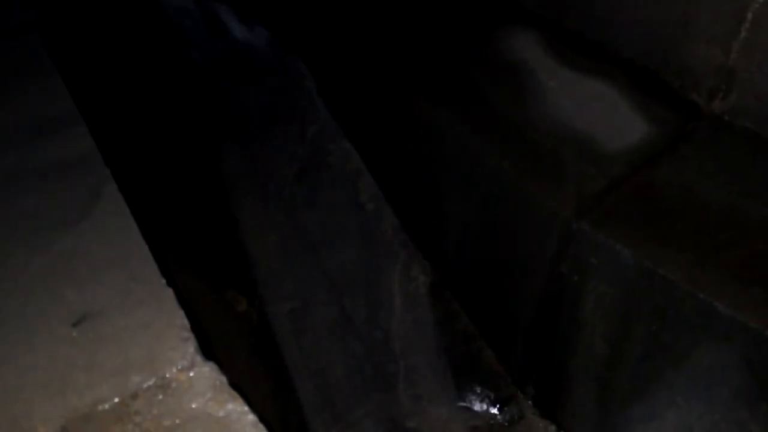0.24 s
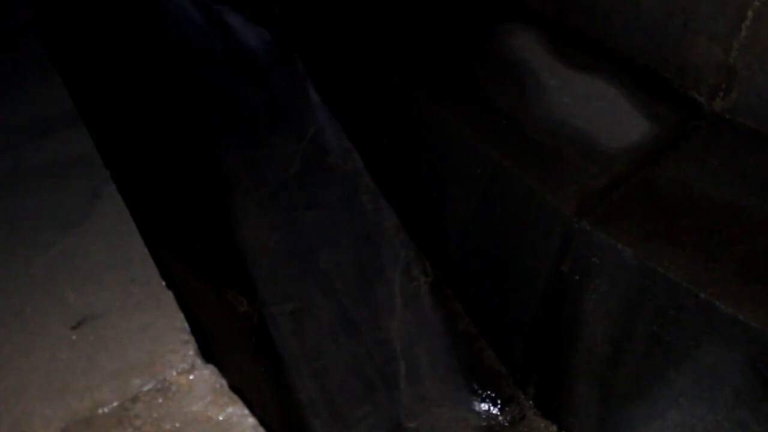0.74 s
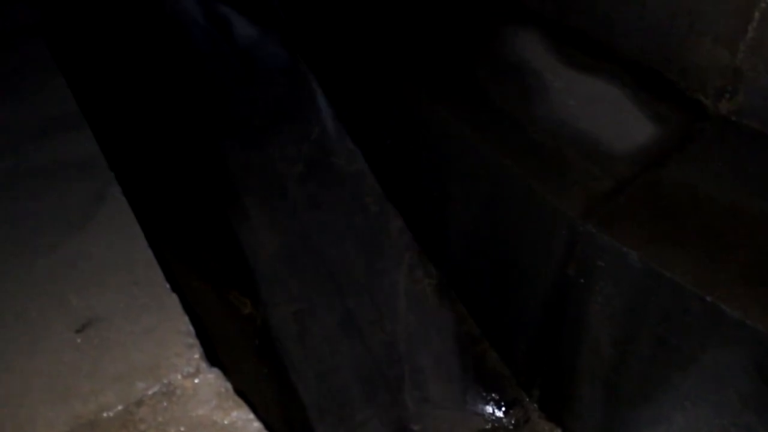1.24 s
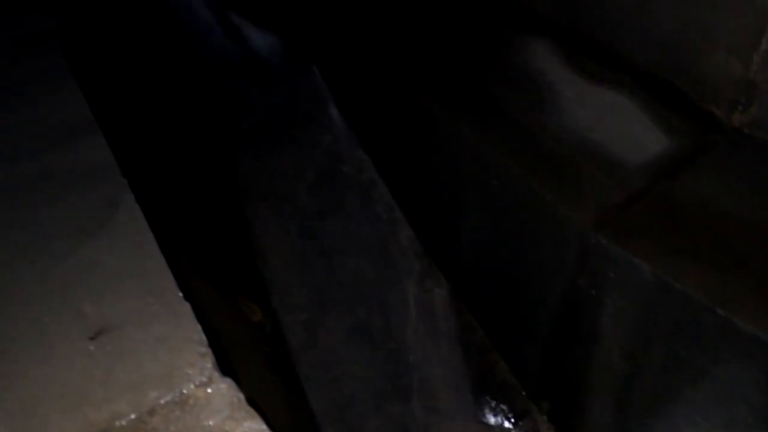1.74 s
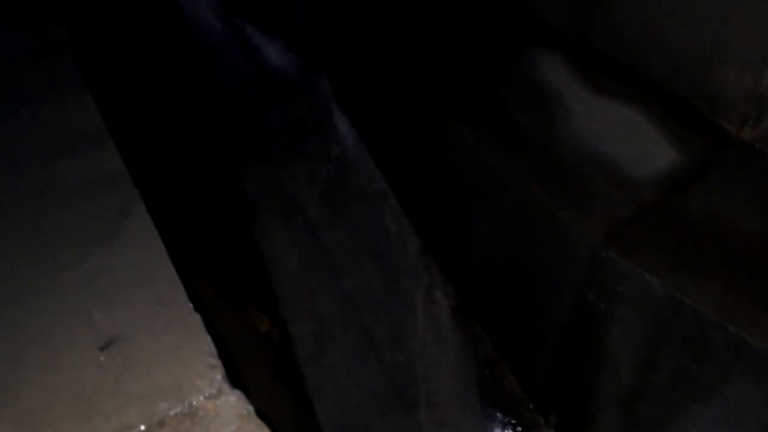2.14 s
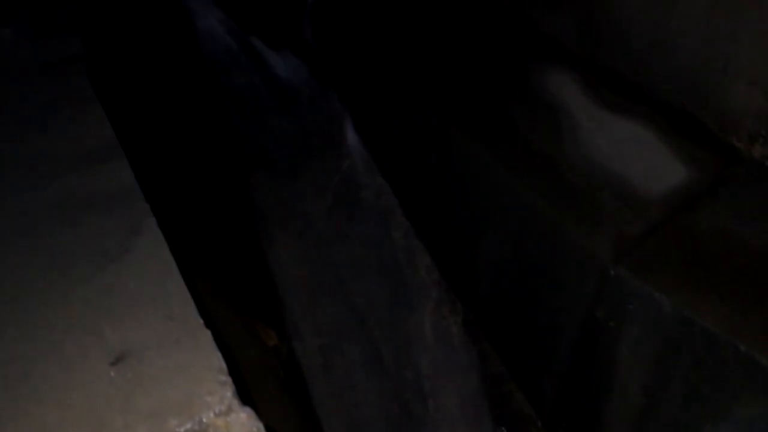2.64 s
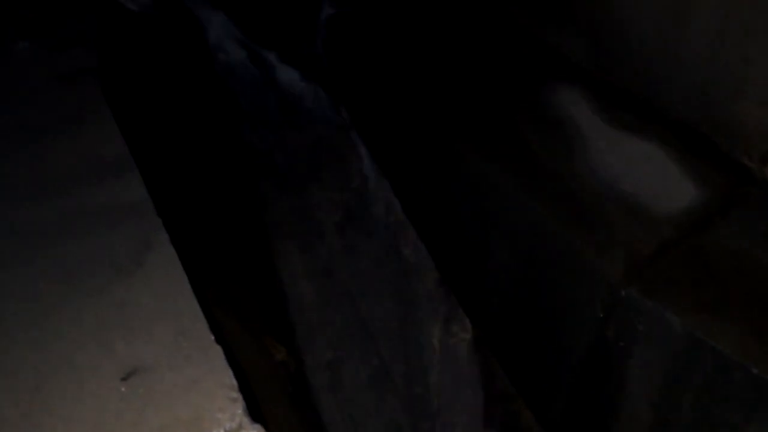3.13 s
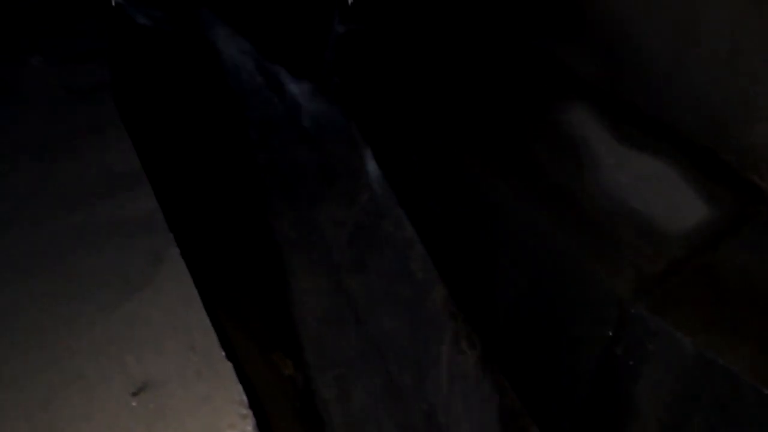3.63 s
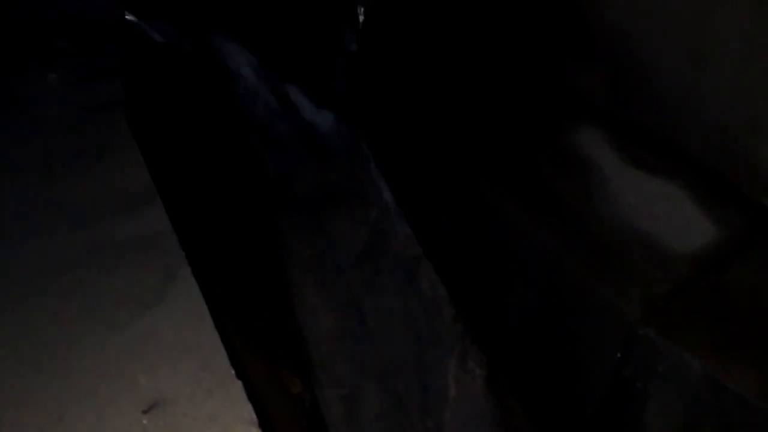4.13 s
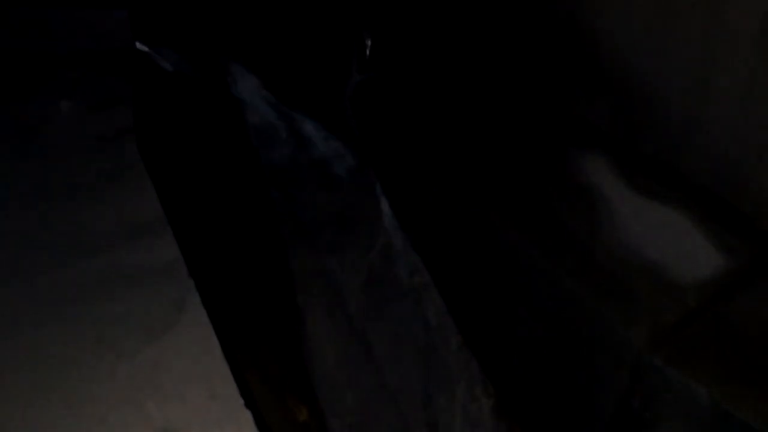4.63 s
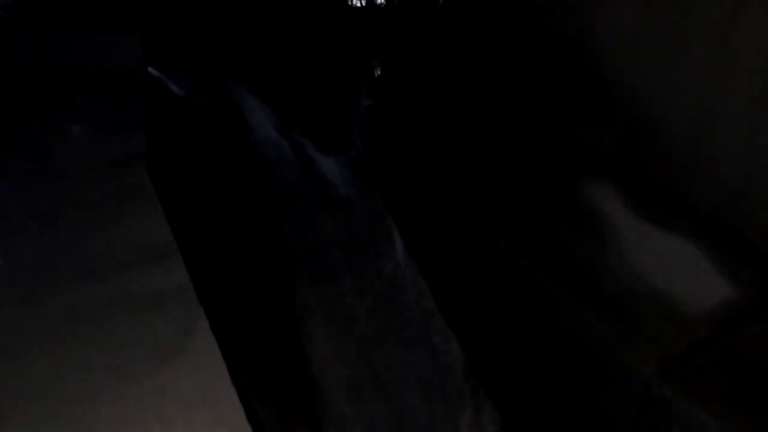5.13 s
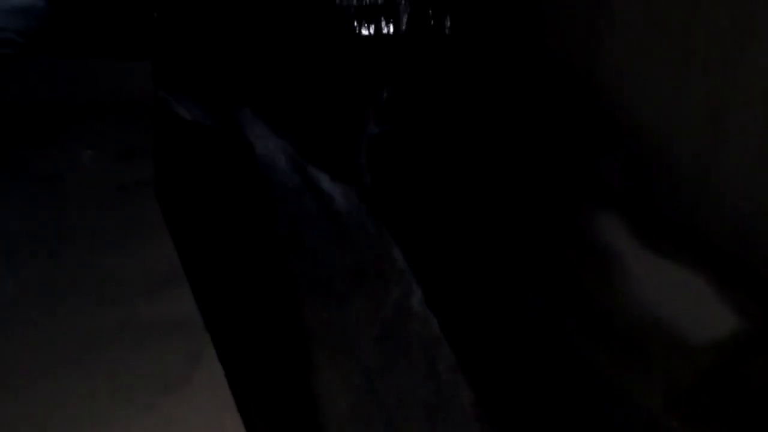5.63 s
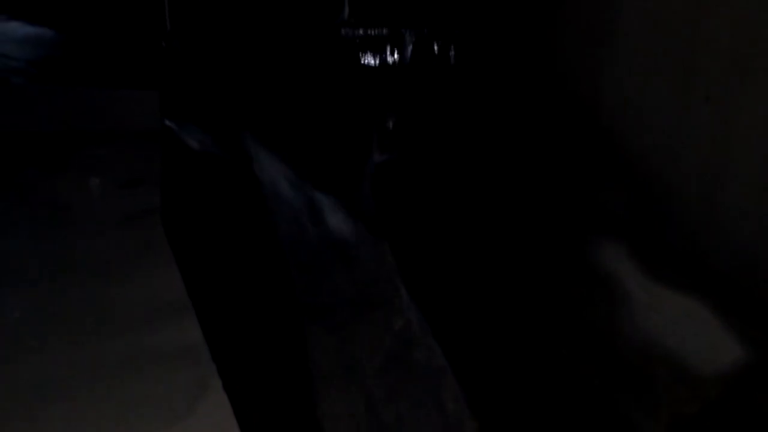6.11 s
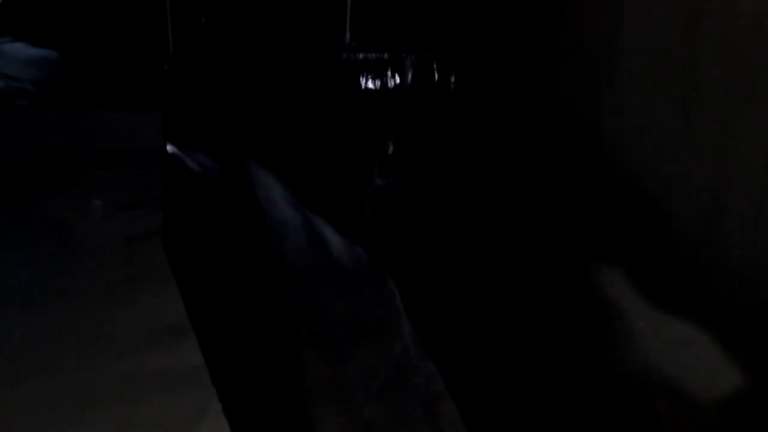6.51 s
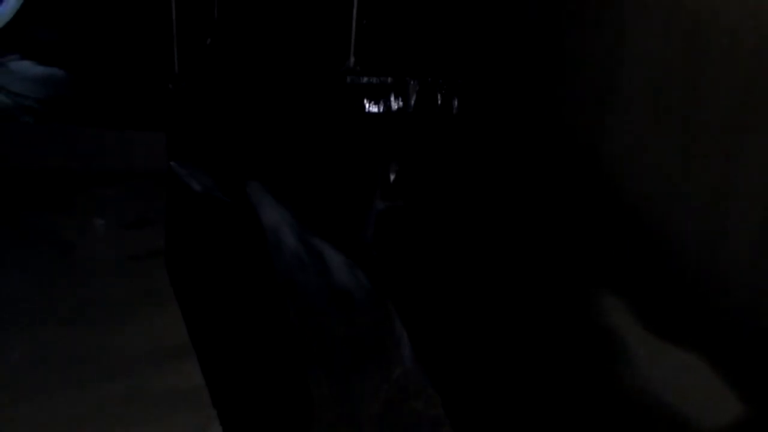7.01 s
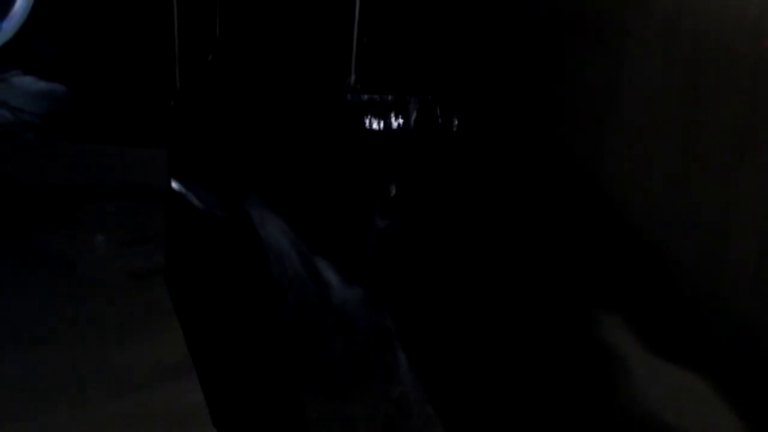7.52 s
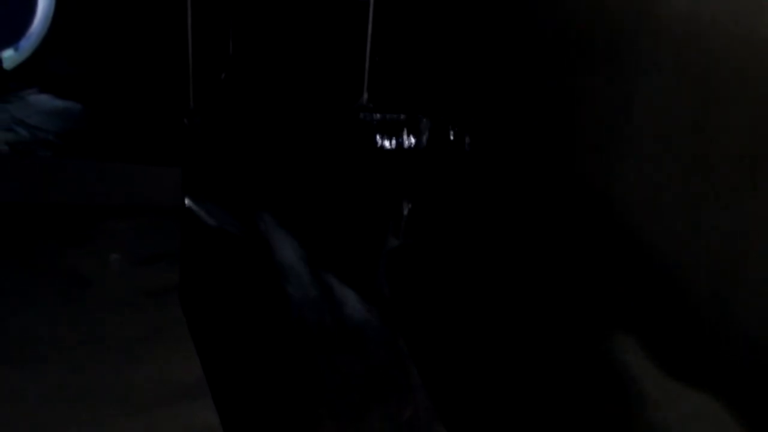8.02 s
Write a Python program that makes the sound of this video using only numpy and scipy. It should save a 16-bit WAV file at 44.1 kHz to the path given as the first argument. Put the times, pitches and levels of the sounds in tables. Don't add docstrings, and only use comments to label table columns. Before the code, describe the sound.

For about 8.3 seconds water rushes through a large concrete drain tunnel. From 0 s it is already at full strength: a dense, steady hiss of bubbles and turbulence, strongest around 1.5 to 3.5 kHz, smeared by a tunnel echo of over a second. Fine spray fizzes and spatters on top, fading very slightly towards the end; a gurgle and faint hollow hum near 200 to 300 Hz lie beneath. Short wet slaps come irregularly, for example near 0.4, 1.9, 3.2, 3.7, 5.8 and 8.0 s, each followed by a quick dip of the whole level that recovers within a fraction of a second, so the hiss flutters. Soft low gulps of trapped air surface near 0.5, 2.7, 4.6, 5.1, 6.2 and 7.7 s. The small microphone gives a near-mono, bass-light sound with sharply limited treble. The flow continues unbroken to the end.

```python
import sys
import numpy as np
from scipy import signal
from scipy.fft import rfft, irfft, next_fast_len
from scipy.io import wavfile
from scipy.ndimage import uniform_filter1d, map_coordinates

SR = 44100
rng = np.random.default_rng(int(sys.argv[2]) if len(sys.argv) > 2 else 0)


def wav_record(signal):
    frames = np.transpose(np.atleast_2d(signal))
    bounded = np.clip(frames, -1, 1)
    quanta = np.round(bounded * 32767).astype(np.int16)
    wavfile.write(sys.argv[1], SR, quanta)


def nominal_scale(level):
    x = np.asarray(level, float) / 20
    return 10 ** x


N = 364266


def unit(x):
    return x / np.sqrt(np.mean(x ** 2) + 1e-20)


def along(points, hz):
    f, v = np.transpose(points)
    return np.interp(np.log(hz + 1), np.log(f + 1), v)


def wobble(rate):
    knots = rng.standard_normal(int(N * rate / SR) + 4)
    return map_coordinates(knots, [np.arange(N) * rate / SR])


def filtered(x, response):
    m = next_fast_len(len(x) + 8192)
    return irfft(rfft(x, m) * response(np.fft.rfftfreq(m, 1 / SR)), m)[:len(x)]


def after(events, shape, length):
    starts = [round(s * SR) for s, _ in events]
    kicks = np.bincount(starts, [size for _, size in events], N)
    return signal.fftconvolve(kicks, shape(np.arange(length) / SR))[:N]


def churn(patchy_db, wide, long):
    z = signal.stft(rng.standard_normal(N + SR), nperseg=512)[2]
    field = uniform_filter1d(rng.standard_normal(z.shape), int(wide), axis=0)
    field = uniform_filter1d(field, int(long), axis=1)
    return unit(signal.istft(z * nominal_scale(patchy_db * unit(field)), nperseg=512)[1][:N])


def bubbles(count, low_hz, high_hz, cycles, scatter_db):
    draw = rng.random((count, 3))
    hz = low_hz + (high_hz - low_hz) * draw[:, 1:2]
    t = np.arange(320) / SR
    age = t * hz / cycles
    size = nominal_scale(-scatter_db * np.log(draw[:, 2:] + 1e-4)) * np.sqrt(hz)
    envelope = np.exp(-3 * age) * (1 - np.exp(-20 * age))
    wave = size * envelope * np.sin(2 * np.pi * hz * t * (1 + 0.11 * age))
    at = (draw[:, :1] * N).astype(int) + np.arange(320)
    return unit(np.bincount(at.ravel(), wave.ravel(), N + 320)[:N])


# (frequency [Hz], t60 [s])
TUNNEL_DECAY = [(200, 1.5), (2000, 1.25), (10000, 0.31)]


def echo(x):
    hz, t, z = signal.stft(rng.standard_normal(SR), SR, nperseg=256)
    fade = nominal_scale(-60 * t / along(TUNNEL_DECAY, hz)[:, None])
    tail = signal.istft(z * fade, SR, nperseg=256)[1]
    return unit(irfft(rfft(x) * rfft(tail, N), N))


# (frequency [Hz], level [dB per Hz])
RUSH_COLOUR = [(25, -44.5), (158, -25), (190, -16.5), (357, -17), (430, -13), (510, -10), (780, -5.5),
               (1000, -2.5), (1350, -7), (1750, -1.5), (2300, 0.5), (3100, -1), (3500, -4), (5500, -19)]


def rush_and_gurgle():
    near = bubbles(count=9000, low_hz=394, high_hz=4260, cycles=5.3, scatter_db=2.0)
    body = unit(churn(0.24, 5, 6) + 0.24 * near + 0.18 * echo(near))
    colour = lambda hz: nominal_scale(along(RUSH_COLOUR, hz))
    deep = lambda hz: 1 / (1 + (hz / 1350) ** 8)
    below_spray = lambda hz: 1 / (1 + (hz / 3600) ** 8)
    gurgle = unit(filtered(body, lambda hz: colour(hz) * deep(hz)))
    rush = unit(filtered(body, lambda hz: colour(hz) * (1 - deep(hz)) * below_spray(hz)))
    return rush, gurgle


# (frequency [Hz], level [dB per Hz])
SPRAY_COLOUR = [(2000, 8), (3500, 2), (5000, -4), (6200, -7.5), (8000, -15.5), (11000, -24), (14500, -30),
                (15700, -33)]


def spray():
    drops = bubbles(count=6000, low_hz=2940, high_hz=15000, cycles=2.6, scatter_db=2.5)
    fizz = unit(churn(0.4, 26, 5.4) + 0.21 * drops)
    above_rush = lambda hz: 1 / (1 + (3400 / (hz + 1)) ** 8)
    spatter = nominal_scale(0.4 * wobble(7.9) + 0.37 * wobble(40))
    return spatter * unit(filtered(fizz, lambda hz: nominal_scale(along(SPRAY_COLOUR, hz)) * above_rush(hz)))


# (time [s], level [dB])
FLOW = [(0.0, -26.5), (0.75, -26.1), (1.5, -26.5), (2.25, -25.5), (3.0, -26.0), (3.75, -26), (4.51, -26.1),
        (5.26, -26), (6.01, -25.5), (6.76, -25), (7.51, -26), (8.26, -26)]


def flow_db():
    return np.interp(np.arange(N) / SR, *np.transpose(FLOW))


def water():
    t = np.arange(N) / SR
    rush_db = flow_db()
    mean_db = rush_db.mean()
    rush, gurgle = rush_and_gurgle()
    spray_db = -5 - 0.1362 * t
    bright = nominal_scale(rush_db) * (rush + nominal_scale(spray_db) * spray())
    follow = 0.53
    gurgle_db = mean_db - 5.5 + follow * (rush_db - mean_db) + 0.4 * wobble(3.72)
    surge = nominal_scale(0.22 * wobble(13) + 0.16 * wobble(30) + 0.4 * wobble(90))
    return surge * (bright + nominal_scale(gurgle_db) * gurgle)


# (time the gain control reacts [s], swell of the rush [dB], drop of the gain [dB])
SPLASHES = [(0.366, 2, 4), (0.662, 0.2, 3), (0.886, -0.5, 4.5), (1.03, 1, -1), (1.91, -1, 5.5),
            (2.254, -2, 4), (2.542, -0.5, 4.5), (2.726, 1.5, 1), (2.998, 0, 3), (3.15, 1, 0),
            (3.238, 2.1, 4.5), (3.478, 2, -1.5), (3.67, -1, 7), (3.726, 1.5, 2), (4.214, 0, 4.5),
            (4.358, 1.5, 1), (4.63, 0.9, 4.4), (4.95, 1.2, 2.5), (5.502, 0.1, 4), (5.782, 0.5, 4.5),
            (5.854, 1.2, 4.5), (6.094, -1, 3.5), (6.262, -0.5, 5), (6.534, 0, 3.9), (6.742, 0.2, 3.4),
            (7.454, -0.5, 3.5), (7.974, -0.5, 7.5), (8.126, 1, 3)]
REACT_S = 0.0161


def splashes():
    slap = lambda t: np.exp(-t / 0.002) * np.sin(2 * np.pi * 2100 * t)
    slaps = [(max(s - REACT_S, 0), nominal_scale(2.2 * drop_db - 27)) for s, _, drop_db in SPLASHES]
    rings = after(slaps, slap, 400)
    return filtered(rings, lambda hz: 1 / (1 + (700 / (hz + 1)) ** 4))


def splash_swell_db():
    bump = lambda t: np.sin(np.pi * t * SR / 2000) ** 2
    swells = [(max(s - REACT_S - 1000 / SR, 0), swell_db) for s, swell_db, _ in SPLASHES]
    return after(swells, bump, 2000)


# (time [s], pitch [Hz], level [dB], length [s])
GULPS = [(.5, 237, -44.5, 0.11), (2.1, 212, -47, 0.13), (2.657, 218, -44.5, 0.093), (4.047, 215, -47, 0.17),
         (4.56, 218, -44, 0.17), (5.106, 190, -43, 0.17), (5.22, 283, -43.5, .2), (6.187, 229, -41.5, 0.13),
         (6.38, 217, -44, 0.16), (6.93, 223, -44, 0.1), (7.44, 257, -45, 0.11), (7.724, 222.5, -43, 0.14)]


def gulps():
    t = np.arange(N) / SR
    out = np.zeros(N)
    for start, hz, db, length in GULPS:
        age = np.clip(3 * (t - start) / length, 0, 9)
        out += nominal_scale(db) * age * np.exp(1 - age) * np.sin(2 * np.pi * hz * t)
    return out


# (frequency [Hz], width [Hz], level [dB])
CROSS_MODES = [(190, 8.6, -28), (213.4, 20, 4), (257, 30, 3), (293, 21, -6.5), (325, 22, -1.5)]


def hum():
    modes = lambda f: sum(nominal_scale(db) * 1j * f * w / (c * c - f * f + 1j * f * w) for c, w, db in CROSS_MODES)
    cut_on = lambda f: 1 / (1 + (172 / (f + 1)) ** 12)
    ringing = filtered(rng.standard_normal(N), lambda f: modes(f) * cut_on(f))
    sway = nominal_scale(2.5 * wobble(4))
    return nominal_scale(flow_db().mean() - 23) * unit(ringing * sway)


def scene():
    mono = nominal_scale(splash_swell_db()) * (water() + hum()) + splashes() + gulps()
    return np.array([mono, mono])


# (time [s], centre [Hz])
SIDE_FLECKS = [(.024, 7600), (.024, 10300), (.628, 7000), (.628, 8900), (.628, 14900), (1.043, 6600),
               (1.043, 13800), (2.065, 10600), (2.766, 8600), (2.766, 13700), (2.879, 4700), (3.182, 6950),
               (3.319, 4740), (3.319, 8300), (3.319, 11700), (3.946, 7550), (4.274, 5150), (4.274, 11700),
               (4.274, 13800), (4.388, 9600), (4.993, 6300), (4.993, 8250), (4.993, 11000), (5.687, 6950),
               (5.687, 12400), (6.059, 4680), (6.059, 8950), (6.13, 15000), (6.152, 6950), (6.152, 13750)]


def side_flecks(mono):
    first, spacing = 1015, 1024
    mid, side, other = mono.copy(), np.zeros(N), np.roll(mono, SR)
    fade = np.hanning(1600)
    for s, centre_hz in SIDE_FLECKS:
        centre = first + spacing * round((s * SR - first) / spacing)
        at = slice(centre - 800, centre + 800)
        width_hz = min(0.22 * centre_hz, 1800)
        band = lambda hz: abs(hz - centre_hz) < width_hz / 2
        mid[at] -= 0.25 * fade * filtered(mono[at], band)
        side[at] += fade * filtered(other[at], band)
    return np.array([mid + side, mid - side])


def top_cut(x):
    return signal.sosfilt(signal.butter(12, 16410, fs=SR, output="sos"), x)


def record(dry):
    grab_s, recover_s = 0.0057, 0.068
    duck = lambda t: (1 - np.exp(-t / grab_s)) * np.exp(-t / recover_s)
    duck_db = after([(s, drop_db) for s, _, drop_db in SPLASHES], duck, SR // 2)
    mono = filtered(dry[0] * nominal_scale(0.96 - 0.63 * duck_db), lambda hz: hz < 15740)
    return top_cut(side_flecks(mono))


dry = scene()
out = record(dry)
wav_record(out)
```